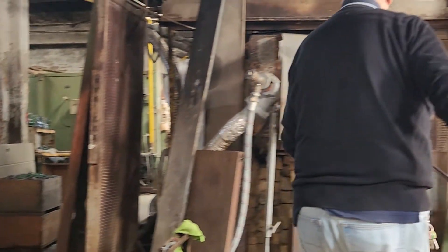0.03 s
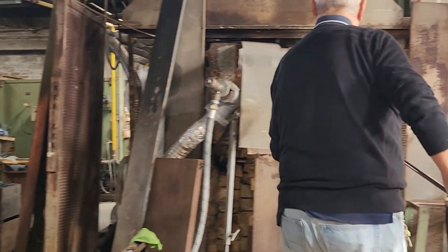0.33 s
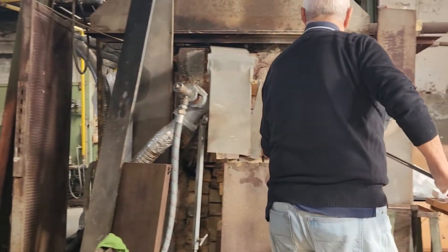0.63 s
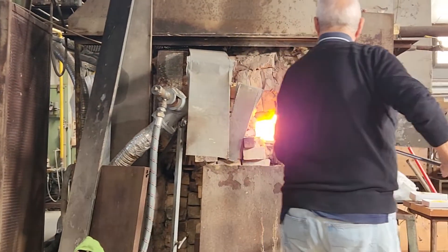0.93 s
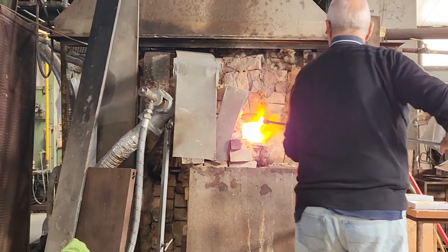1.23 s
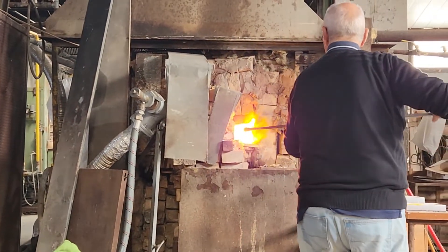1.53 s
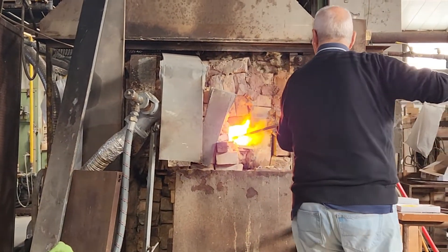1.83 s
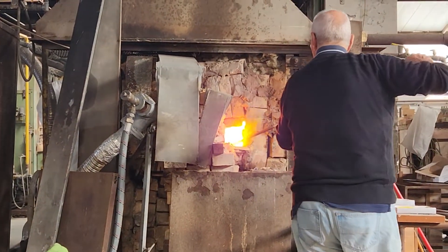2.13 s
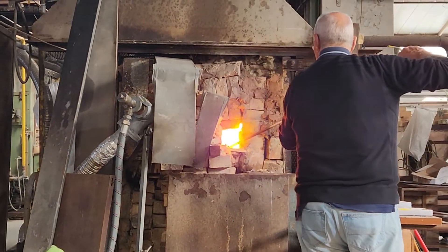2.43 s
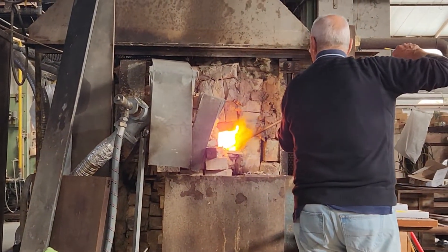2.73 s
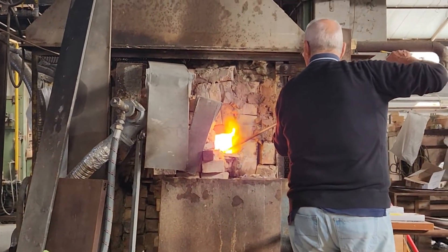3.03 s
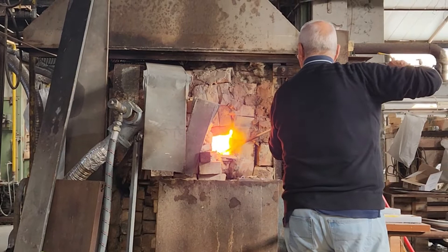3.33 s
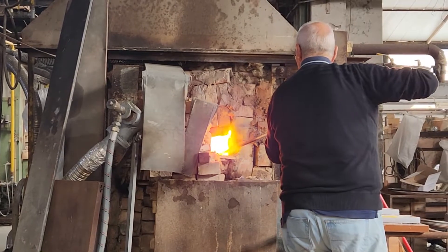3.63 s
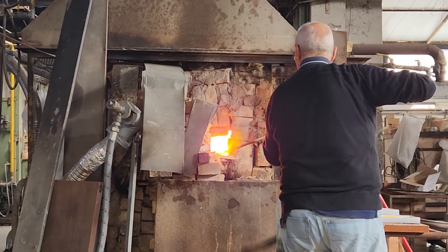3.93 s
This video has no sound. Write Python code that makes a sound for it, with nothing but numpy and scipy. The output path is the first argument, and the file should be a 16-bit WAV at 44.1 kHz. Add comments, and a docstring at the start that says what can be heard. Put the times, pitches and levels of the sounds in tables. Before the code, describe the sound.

The low roar of a furnace flame fills a workshop, over a faint blower whine and a thin hiss slightly to the left. Early on a steel tool clacks once; later the flame gives a few soft puffs.

```python
"""A deep rumble and roar: flame in a workshop's glass furnace, ringing the chamber.
The chamber's boom swells now and then, and the flame flares in soft puffs.
Behind it a blower whines faintly and rushes through its duct, and air hisses at the
burner pipe on the left. A steel tool clacks once."""
import sys
import numpy as np
from scipy import signal
from scipy.fft import rfft, irfft, next_fast_len
from scipy.io import wavfile
from scipy.ndimage import uniform_filter1d, map_coordinates

SR = 44100
rng = np.random.default_rng(int(sys.argv[2]) if len(sys.argv) > 2 else 0)


def pcm_store(signal):
    """Save signal as 16-bit PCM."""
    levels = np.round(np.clip(np.atleast_2d(signal), -1, 1) * 32767)
    wavfile.write(sys.argv[1], SR, levels.astype(np.int16).T)


N = 176400

# stereo balance (frequency [Hz], left minus right [dB])
BALANCE = [(60, 0), (160, 2.05), (280, 0), (550, 2.5), (900, 1.5), (1300, 2.5), (1700, 3), (2200, 2),
           (3000, -0.5)]


def amp(db):
    return 10 ** (np.asarray(db) / 20)


def unit(x):
    return x / np.sqrt(np.mean(x ** 2) + 1e-20)


def along(points, hz):
    """Interpolate (Hz, value) points on a log axis."""
    f, v = np.transpose(points)
    return np.interp(np.log(hz + 1), np.log(f + 1), v)


def curve(points):
    """Interpolate (s, value) points linearly."""
    return np.interp(np.arange(N) / SR, *np.transpose(points))


def wobble(rate_hz):
    """Smooth random curve, rate_hz knots a second."""
    return map_coordinates(rng.standard_normal(400), [np.arange(N) * rate_hz / SR + 2], mode="mirror")


def filtered(x, response):
    m = next_fast_len(N + SR // 2)
    return irfft(rfft(x, m) * response(np.fft.rfftfreq(m, 1 / SR)), m)[..., :N]


def peaks(modes):
    """Gain against frequency of (Hz, width Hz, dB) resonances."""
    return lambda hz: np.sqrt(sum(amp(db) ** 2 / width / (1 + 2 * ((hz - centre) / width) ** 2) ** 2
                                  for centre, width, db in modes))


def joint_rms(modes):
    return np.linalg.norm([amp(db) for _, _, db in modes])


def ear_gains(hz):
    return amp(along(BALANCE, hz) * np.array([[0.5], [-0.5]]))


def room_noise(gain):
    """Stereo noise, rms 1, shaped by gain(hz) and spread by the room."""
    # likeness of the ears (frequency [Hz], coherence [0-1])
    coherence = [(40, .999), (80, 0.99), (150, 1), (260, 0.92), (400, 0.83), (600, 0.95), (850, 0.67),
                 (1150, 0.35), (1400, 0.57), (1700, 0.053), (2200, 0.23), (2700, 0.14), (15000, 0.045)]
    # phase between the ears (frequency [Hz], left lead [rad])
    lead = [(60, 0.092), (150, -0.0014), (300, 0.081), (500, 0.18), (750, 0.85), (1000, -0.37),
            (1400, -1.15), (2000, -0.25)]
    m = next_fast_len(N + 8192)
    hz = np.fft.rfftfreq(m, 1 / SR)
    a, b = rfft(rng.standard_normal((2, m))) * gain(hz)
    spread_rad = np.arccos(along(coherence, hz)) / 2
    mid, side = a * np.cos(spread_rad), b * np.sin(spread_rad)
    lean = amp(along(BALANCE, hz) / 2) * np.exp(0.5j * along(lead, hz))
    return unit(irfft([(mid + side) * lean, (mid - side) / lean], m)[:, :N])


def coloured(spectrum):
    return room_noise(lambda hz: amp(along(spectrum, hz)))


def resonant(modes):
    return joint_rms(modes) * room_noise(peaks(modes))


def steady(x, samples):
    """Hold the running rms near 1, as under a constant fuel feed."""
    return x / np.sqrt(np.abs(uniform_filter1d(np.mean(x ** 2, axis=0), samples)) + 1e-12)


def near_walls(x, echo_gain=0.41, spread_s=0.014, count=24):
    """Weak early echoes off brick and metal comb the sound."""
    delays_s, signs = rng.random(count) * spread_s, rng.choice([-1, 1], count)
    taps = np.bincount((delays_s * SR).astype(int) + 20, signs * echo_gain / np.sqrt(count))
    taps[0] = 1
    return signal.fftconvolve(x, taps)[:N]


def air_jet(gain, noise):
    """Shaped noise, rms 1; its wall echoes shift as the listener walks."""
    fade = np.sin(np.pi / 2 * np.arange(N) / N) ** 2
    here, there = near_walls(noise), near_walls(noise)
    return unit(filtered((1 - fade) * here + fade * there, gain))


def burner_hiss():
    """Slightly unsteady air escapes at the burner pipe; a pillar shades the left treble at first."""
    # hiss at each ear (frequency [Hz], relative density [dB])
    left_spectrum = [(1200, -19), (2500, -0.5), (3500, 3.5), (4000, 0), (4700, 2.5), (5100, -2.5),
                     (5900, 3.5), (6700, -0.5), (7700, 1.5), (8500, -7.5), (10000, -3), (10600, 0.5),
                     (11500, -2.5), (12100, -6.5), (12800, 0), (13900, -2.5), (15800, -1.5)]
    right_spectrum = [(1200, -10), (2500, 1), (3600, 3), (4700, 3), (5100, 0.5), (5900, .5), (7000, -0.5),
                      (8300, -7), (9400, -2), (10600, -11), (11700, -6), (13300, -9.5), (14200, -14),
                      (15800, -14)]
    # air jet resonances (frequency [Hz], width [Hz], level [dB])
    jet_modes = [(6250, 270, -52.5), (7270, 300, -58), (11300, 300, -62), (13150, 400, -57),
                 (14660, 180, -58), (15200, 220, -59)]
    left_db, right_db, right_lead_s = -44, -46.5, 35e-6
    shade_db, shade_s, shade_hz = -5.5, 0.22, 5000
    bright_db, bright_at_s, bright_width_s = -54, 0.38, 0.22
    t = np.arange(N) / SR
    direct, diffuse, ring_noise, bright_noise = rng.standard_normal((4, N))
    lowpass = lambda hz: np.exp(-(hz / shade_hz) ** 2)

    ring = joint_rms(jet_modes) * amp(0.7 * wobble(6.16)) * air_jet(peaks(jet_modes), ring_noise)
    bright_swell = amp(bright_db) * np.exp(-((t - bright_at_s) / bright_width_s) ** 2)
    bright = bright_swell * air_jet(peaks([(13000, 510, 0)]), bright_noise)
    left = amp(left_db) * air_jet(lambda hz: amp(along(left_spectrum, hz)), direct) + ring + bright
    lows = filtered(left, lowpass)  # these bend round the pillar
    left = lows + amp(shade_db * np.exp(-t / shade_s)) * (left - lows)

    coherence = lambda hz: 0.23 * (1 - lowpass(hz))
    common = filtered(direct, lambda hz: coherence(hz) * np.exp(2j * np.pi * hz * right_lead_s))
    separate = filtered(diffuse, lambda hz: np.sqrt(1 - coherence(hz) ** 2))
    right = amp(right_db) * air_jet(lambda hz: amp(along(right_spectrum, hz)), common + separate)
    return amp(0.35 * wobble(6.82)) * np.array([left, right])


def blower(blade_hz=581.7):
    """Blade harmonics over an unsteady rush that rings duct and casing."""
    # whine (multiple of blade rate, level [dB])
    harmonics = [(3, -61.5), (4, -63.5)]
    # resonances (frequency [Hz], width [Hz], level [dB])
    duct_modes = [(1168, 38, -53), (1394.6, 25, -49), (1438, 32, -52)]
    casing_modes = [(1234, 5.6, -57), (2030, 97, -61), (2950, 200, -56.5)]
    # duct ring (time [s], gain [dB])
    duct_swell = [(0, 1.5), (.45, -1.5), (.95, -4), (1.4, -1), (1.65, 5), (1.85, 3.5), (2.05, 4.5),
                  (2.5, -3.5), (2.82, 2.5), (3.2, -6), (3.7, 2), (4, -3)]
    phase = 2 * np.pi * np.cumsum(blade_hz * (1 + 0.0008 * wobble(6.2))) / SR
    whine = 0
    for k, db in harmonics:
        waver_db = 2 * np.array([wobble(4.4), wobble(6.1)])
        whine += amp(db + waver_db) * ear_gains(k * blade_hz) * unit(np.sin(k * phase))
    return whine + amp(curve(duct_swell)) * resonant(duct_modes) + resonant(casing_modes)


def tool_clack():
    """A steel tool knocks, chatters and rings briefly; the workshop reverberates."""
    # contacts (time [s], gain [dB])
    contacts = [(1.031, 2.5), (1.037, -4)]
    # impact noise (frequency [Hz], relative density [dB])
    spectrum = [(300, -10), (700, 15), (1100, 8), (1800, 11), (2400, 5), (3000, 6), (3600, -2), (4600, 0),
                (5500, -11), (12000, -32)]
    # tool modes (frequency [Hz], level [dB], t60 [s])
    modes = [(720, -19, 0.04), (1510, -38, 0.15), (1870, -39, 0.072), (2940, -49, 0.2), (3750, -47, .05)]
    knock_db, knock_t60_s, attack_s = -23, 0.024, 0.0022
    room_gain_db, room_t60_s = -23.5, 0.96
    out = 0
    for start_s, gain_db in contacts:
        t = np.maximum(np.arange(N) / SR - start_s, 0)
        decay = amp(-60 * t / knock_t60_s) + amp(room_gain_db - 60 * t / room_t60_s)
        knock = amp(knock_db) * decay * coloured(spectrum)
        ring = sum(amp(db - 60 * t / t60_s) * np.sin(2 * np.pi * hz * t + np.pi * rng.random((2, 1)))
                   for hz, db, t60_s in modes)
        out += amp(gain_db) * (1 - np.exp(-t / attack_s)) * (knock + ring)
    return out


def flame_puffs(width_s=0.0036):
    """Each flare gives one soft push and pull of air."""
    # flares (time [s], level [dB])
    flares = [(2.592, -6), (3.12, -7), (3.755, -5.5)]
    t, out = np.arange(N) / SR, 0
    for centre_s, db in flares:
        u = (t - centre_s) / width_s
        out -= amp(db) * 2 * u * np.exp(-u ** 2)
    return out


def chamber_booms(rise_s=0.074, fall_s=0.064, wander_hz=1.525):
    """Low chamber resonances build, hold and die away, wandering in pitch."""
    # booms (start [s], length [s], pitch [Hz], level [dB])
    booms = [(0.237, 0.26, 71.83, -17), (0.595, 0.263, 164, -21.5), (0.665, 0.47, 123.3, -33.5),
             (1.648, 0.3, 71.6, -16.5), (1.748, 0.24, 165, -17), (1.994, 0.4, 164, -27.5),
             (2.669, 0.28, 163.3, -18.5), (2.697, 0.23, 66, -20), (2.8, 0.19, 99.4, -19.5),
             (3.084, 0.26, 66.15, -22), (3.24, 0.15, 164, -23), (3.455, 0.19, 59.8, -13.5)]
    t, out = np.arange(N) / SR, 0
    for start_s, length_s, hz, db in booms:
        swell = np.clip((t - start_s) / rise_s, 0, 1) * np.clip((start_s + length_s - t) / fall_s, 0, 1)
        phase = 2 * np.pi * np.cumsum(hz + wander_hz * wobble(16)) / SR
        out += amp(db) * swell * unit(np.sin(phase)) * ear_gains(hz)
    return out


def flame(rumble_db=-14.5, roar_db=-27.5):
    """Turbulent flame rumbles and roars, ringing the furnace chamber and mouth."""
    # turbulence (frequency [Hz], relative density [dB])
    rumble_spectrum = [(20, -5), (28, -20), (36, -5), (47, -13.5), (56, 3.5), (68, -4.5), (82, -5.5),
                       (98, -3.5), (112, -6.5), (150, -11), (195, -10), (235, -17.5), (270, -23.5),
                       (400, -44), (1000, -120)]
    roar_spectrum = [(130, -2.5), (250, -21), (295, -3.5), (345, -1.5), (400, -1), (440, -2.5), (560, -0.5),
                     (620, -3), (720, -9.5), (900, -13.5), (1030, -14.5), (1290, -20.5), (1550, -19),
                     (1780, -25.5), (2150, -24.5), (2450, -32.5), (4000, -59), (12000, -120)]
    # resonances of chamber and room, and of the mouth (frequency [Hz], width [Hz], level [dB])
    chamber_modes = [(72, 7.8, -23.5), (115.3, 16, -31.5), (170, 3.5, -33), (318.3, 12.4, -35),
                     (348, 13, -41), (400, 25, -36.5), (463.4, 6.5, -37.5), (495, 4.2, -44.5),
                     (517.5, 5, -37.5), (539, 8.3, -41.5), (599.4, 7, -45), (775, 2.2, -51.5),
                     (834, 3.3, -50), (890.6, 29, -46.5)]
    mouth_modes = [(570.4, 10, -36.5)]
    # slow swells (time [s], gain [dB])
    rumble_swell = [(0, 3), (.42, -6), (.65, -0.5), (1.0, -.5), (1.5, -2), (2.1, 0), (2.45, -2), (2.7, -2),
                    (3.05, -1.5), (3.3, 1.5), (3.55, -2), (3.68, -4), (3.8, -3.5), (4, -4)]
    roar_swell = [(0, 2), (1.15, 0), (1.5, 0), (2.4, -0.5), (2.8, 0), (4, -0.4)]
    mouth_swell = [(0, -1.5), (1.3, 1), (1.8, 1.5), (2.25, 4.5), (2.6, 0), (3.2, -2.5), (4, 1)]
    rumble = amp(rumble_db + curve(rumble_swell)) * steady(coloured(rumble_spectrum), samples=9000)
    flutter_db = 0.58 * wobble(29.94)
    roar = amp(roar_db + curve(roar_swell) + flutter_db) * steady(coloured(roar_spectrum), samples=7000)
    mouth_level = joint_rms(mouth_modes) * amp(curve(mouth_swell))
    mouth = mouth_level * steady(resonant(mouth_modes), samples=8000)
    return rumble + roar + mouth + resonant(chamber_modes)


def scene():
    return flame() + chamber_booms() + flame_puffs() + blower() + burner_hiss() + tool_clack()


def record(dry):
    """Soft low cut, hard band limit."""
    low_cut_hz, top_hz = 23, 15830
    return filtered(dry, lambda hz: (hz < top_hz) * (1 - np.exp(-(hz / low_cut_hz) ** 2)) ** 2)


dry = scene()
out = record(dry)
pcm_store(out)
```